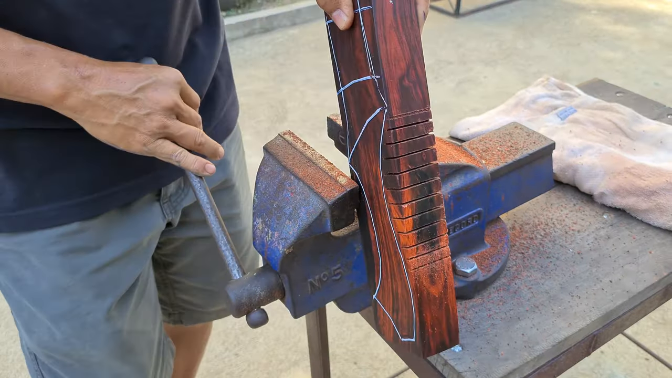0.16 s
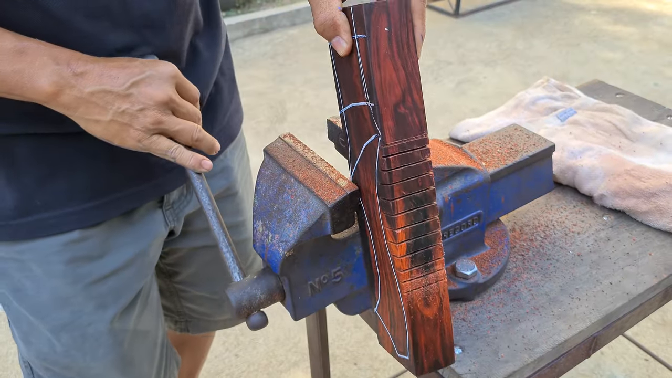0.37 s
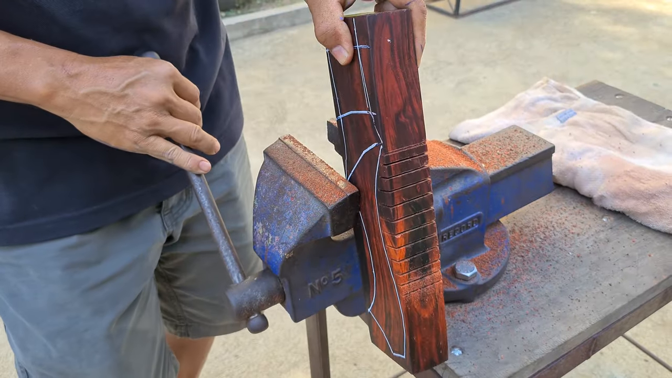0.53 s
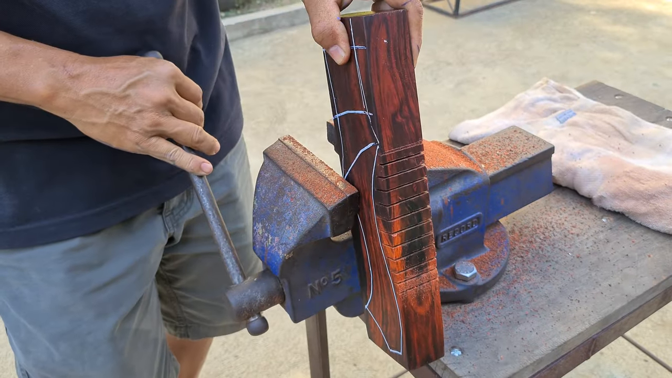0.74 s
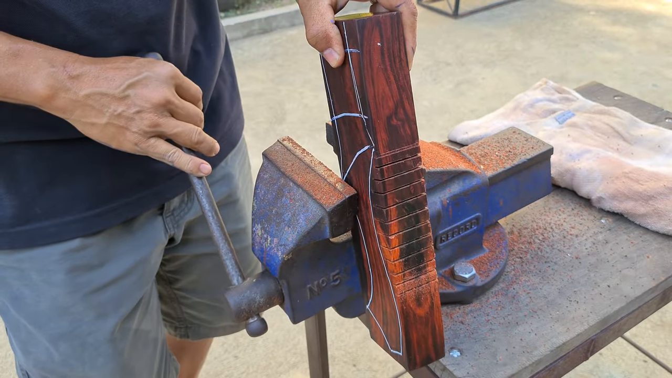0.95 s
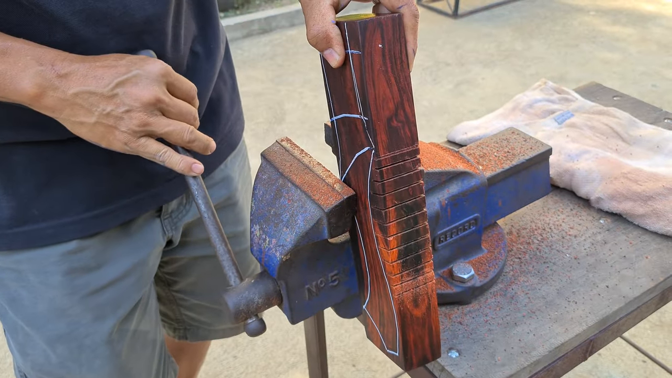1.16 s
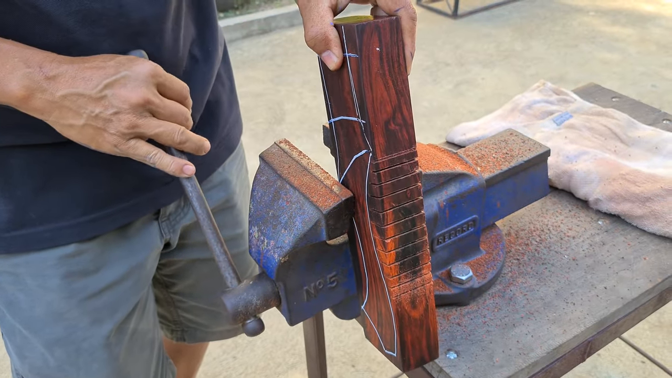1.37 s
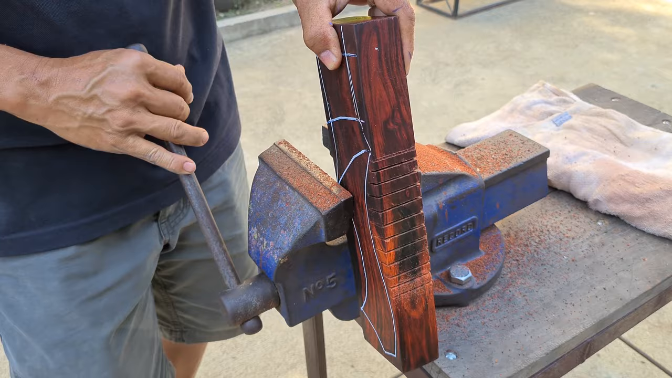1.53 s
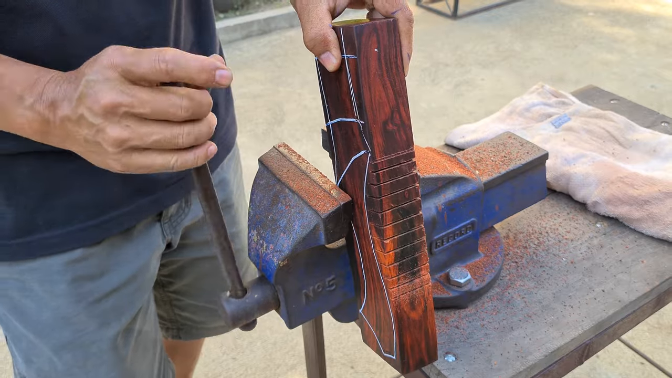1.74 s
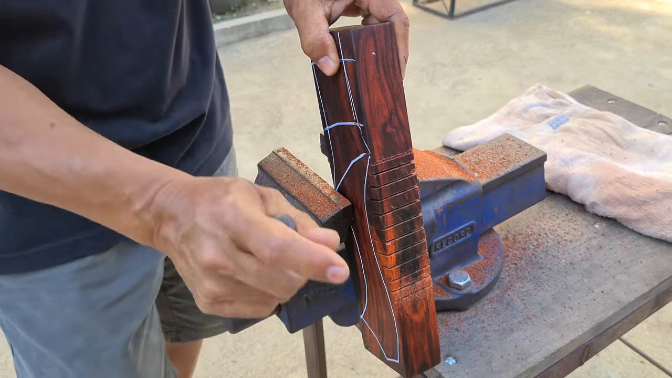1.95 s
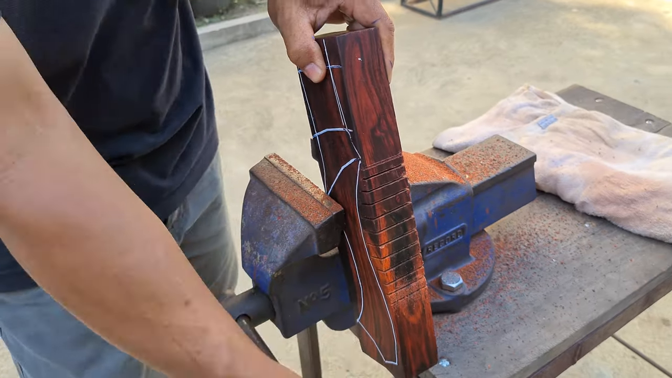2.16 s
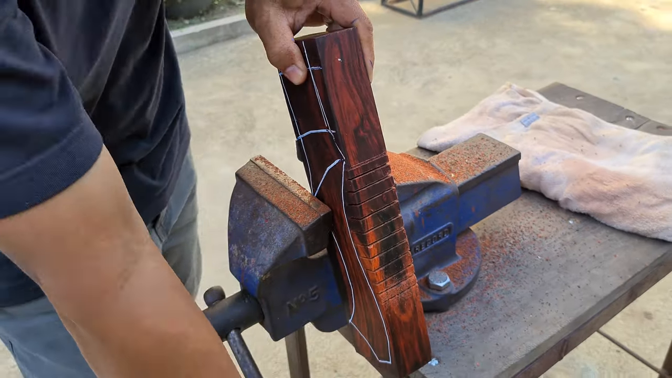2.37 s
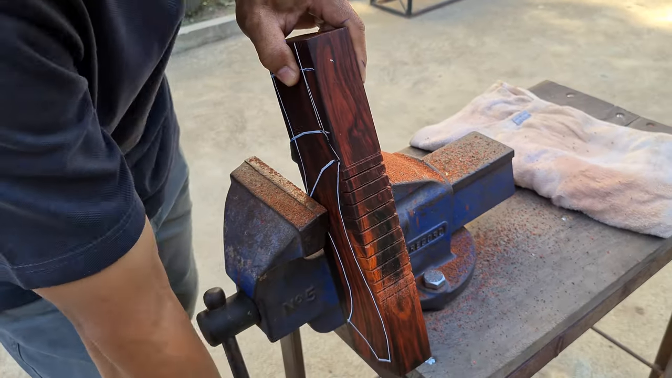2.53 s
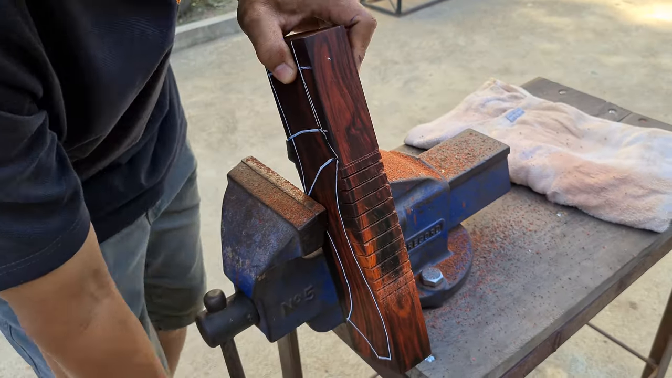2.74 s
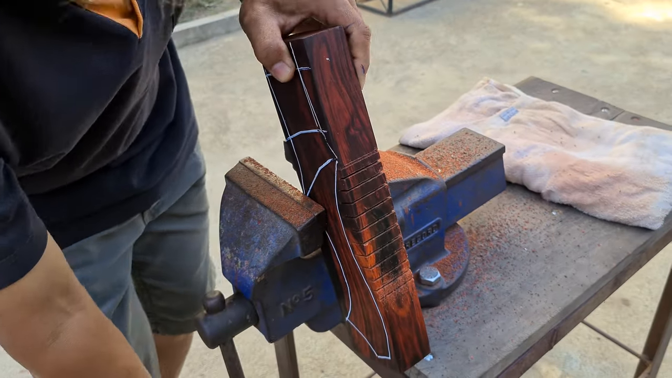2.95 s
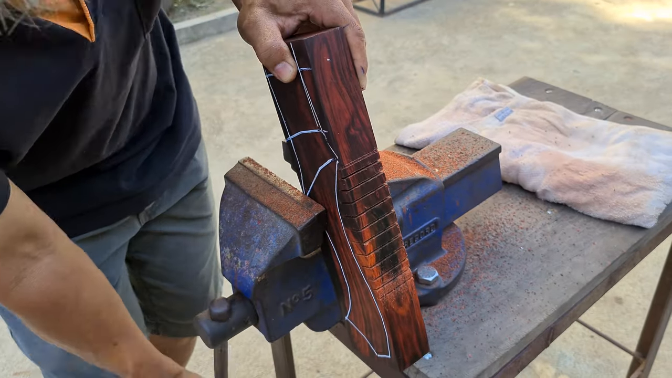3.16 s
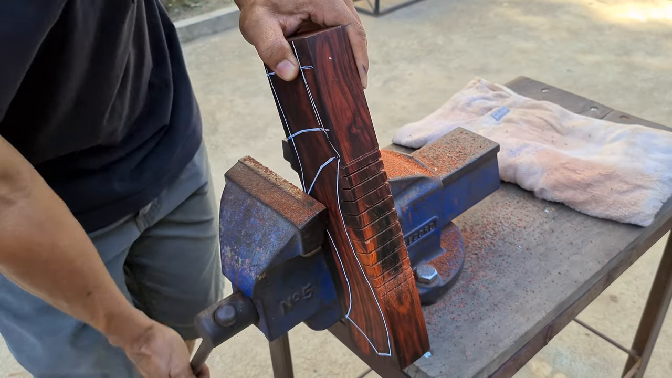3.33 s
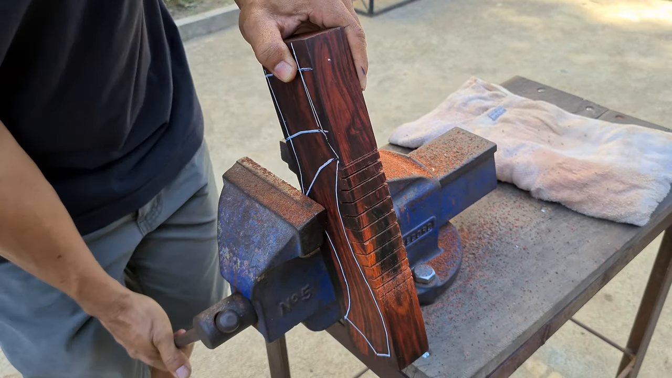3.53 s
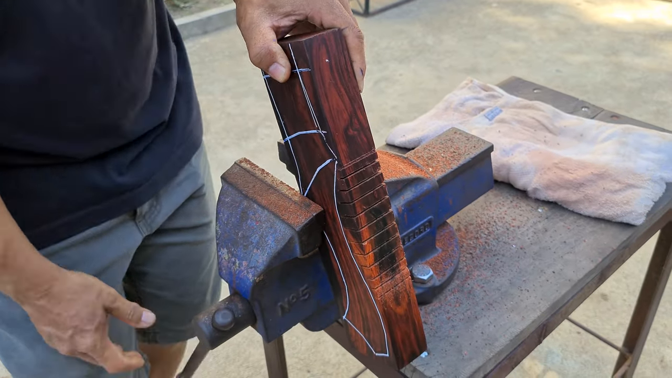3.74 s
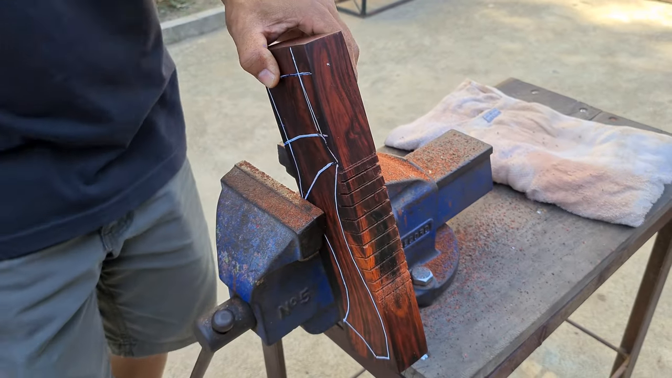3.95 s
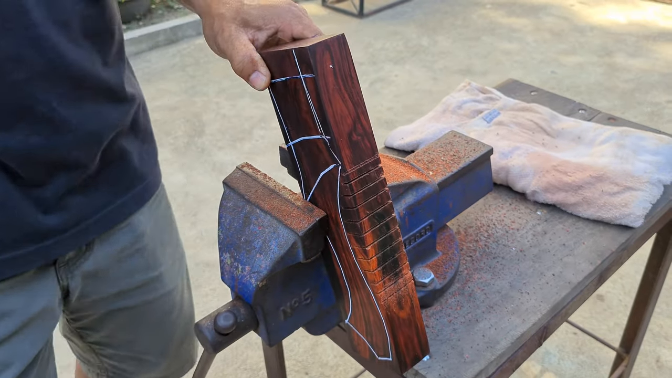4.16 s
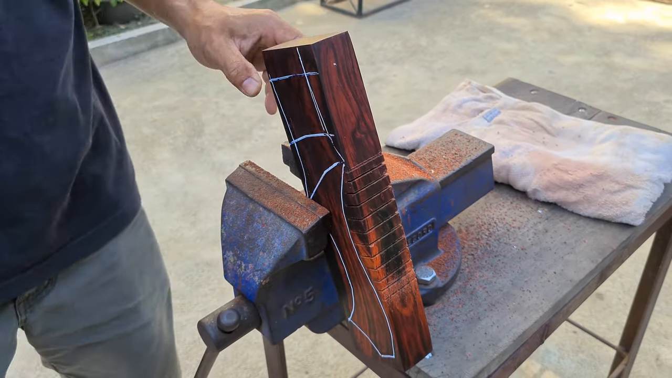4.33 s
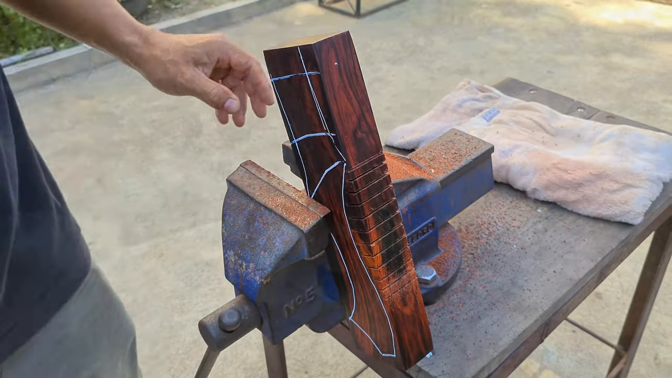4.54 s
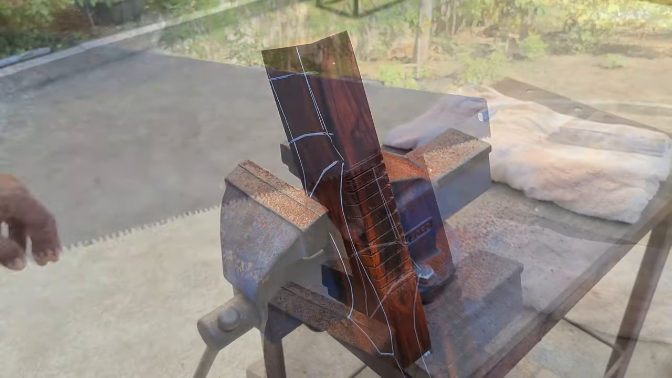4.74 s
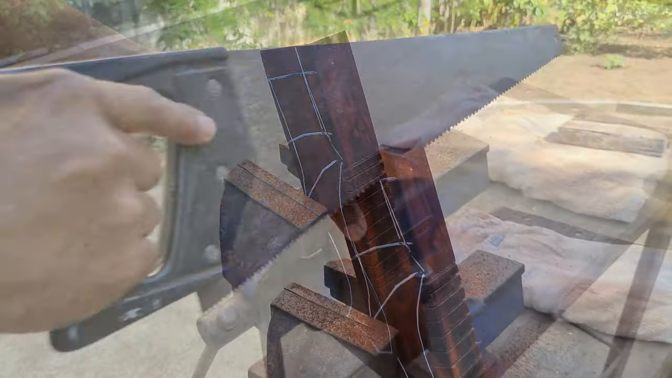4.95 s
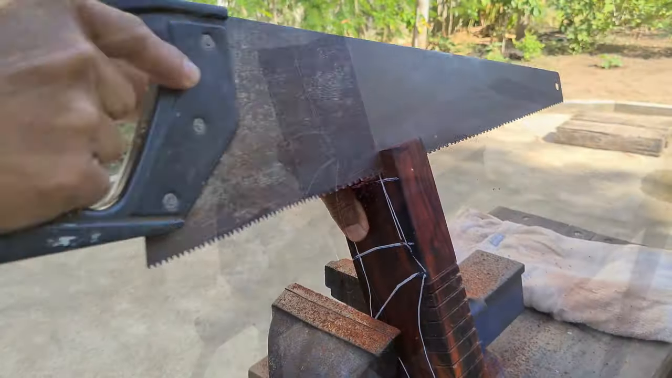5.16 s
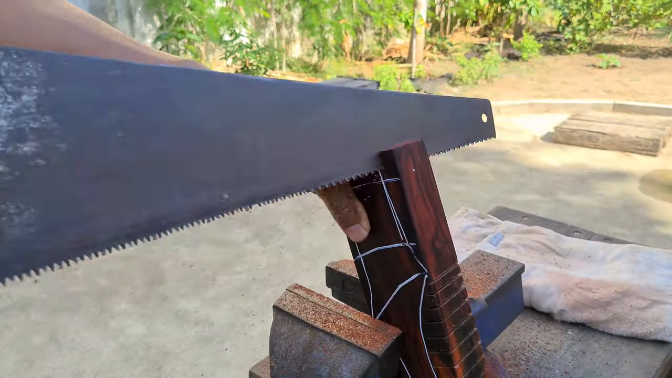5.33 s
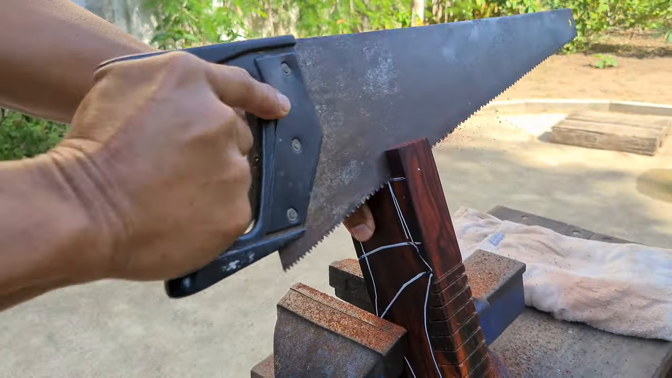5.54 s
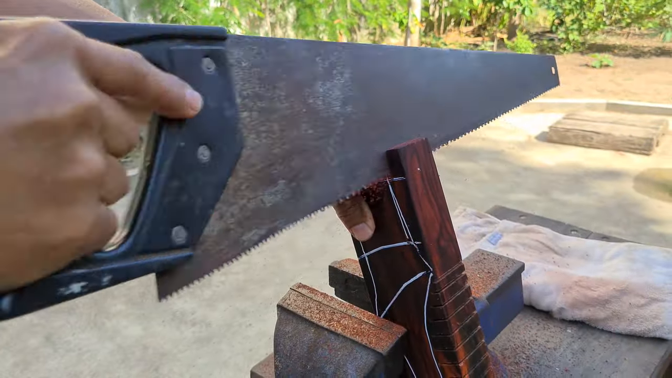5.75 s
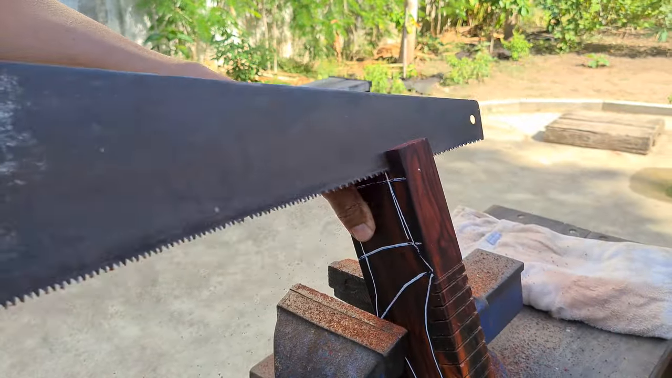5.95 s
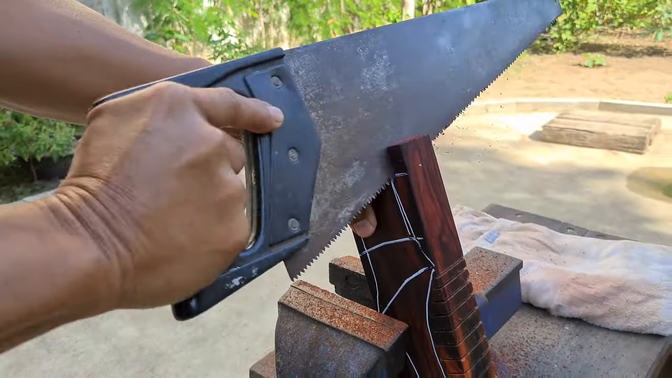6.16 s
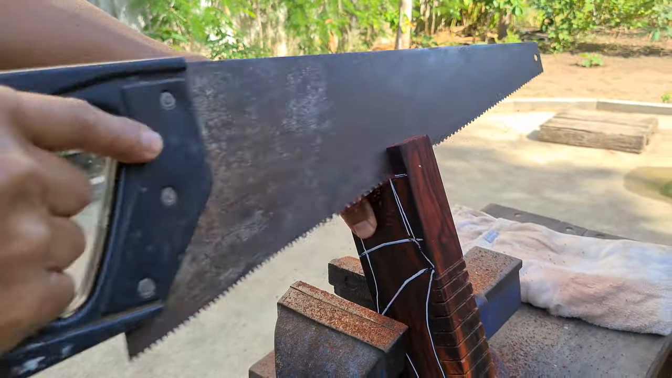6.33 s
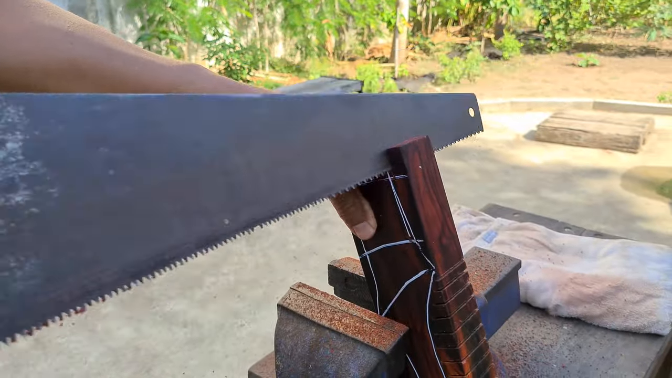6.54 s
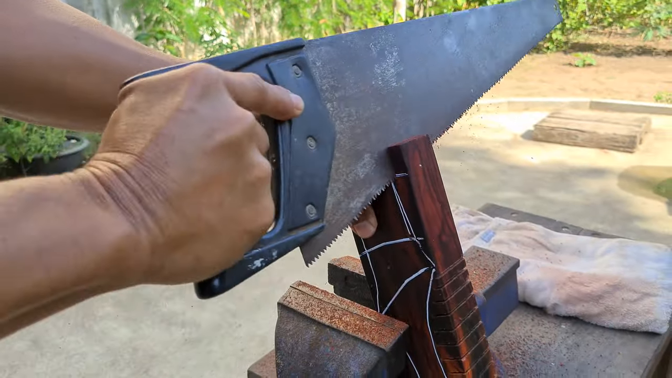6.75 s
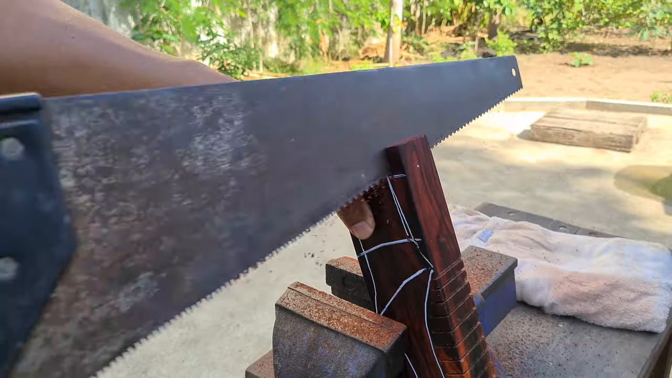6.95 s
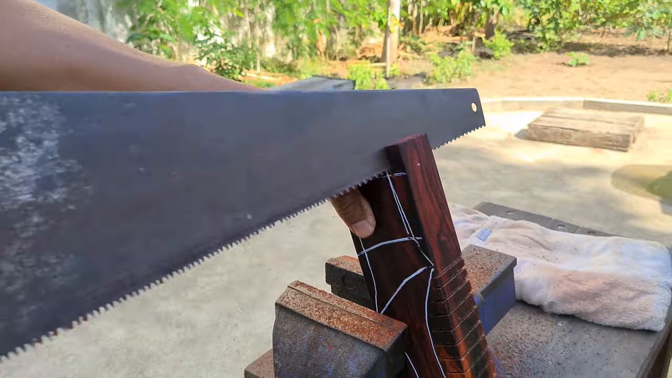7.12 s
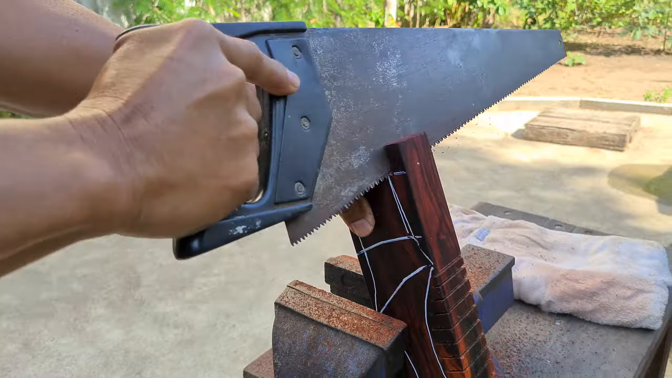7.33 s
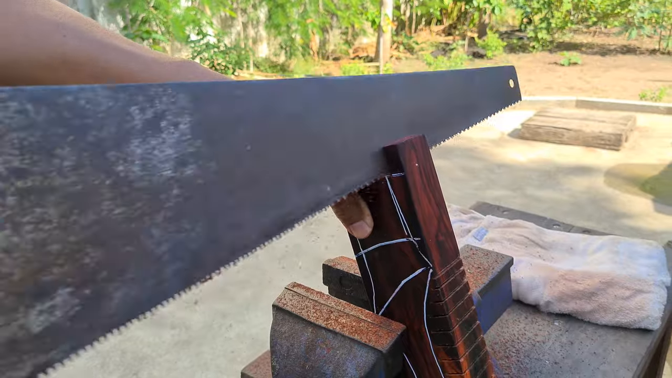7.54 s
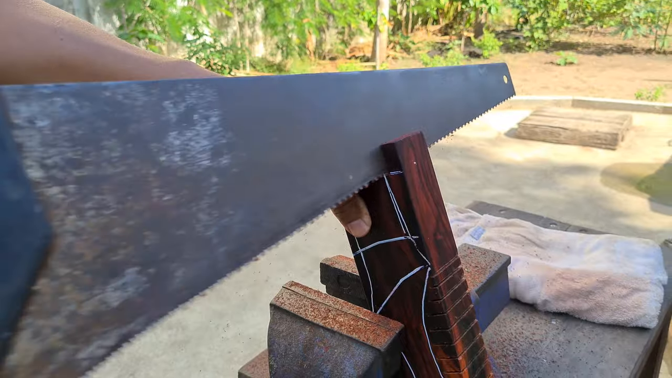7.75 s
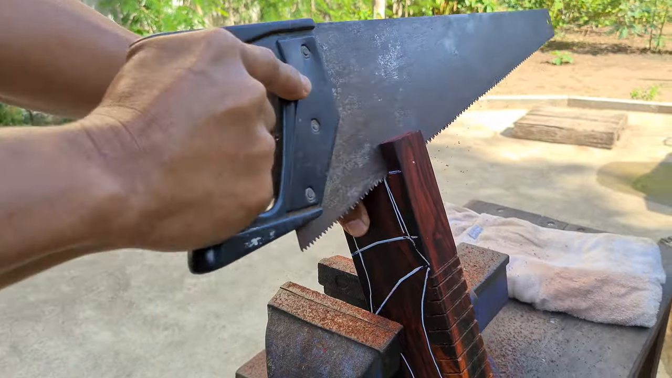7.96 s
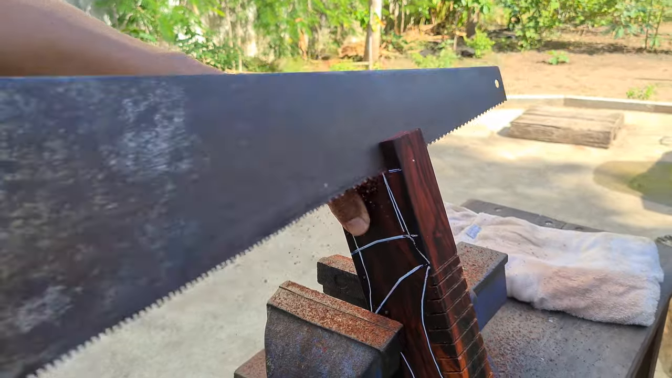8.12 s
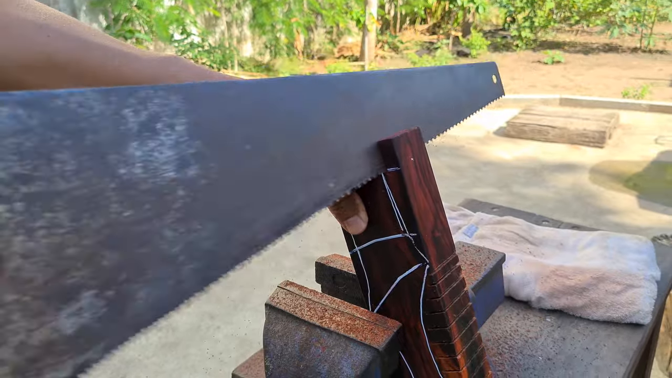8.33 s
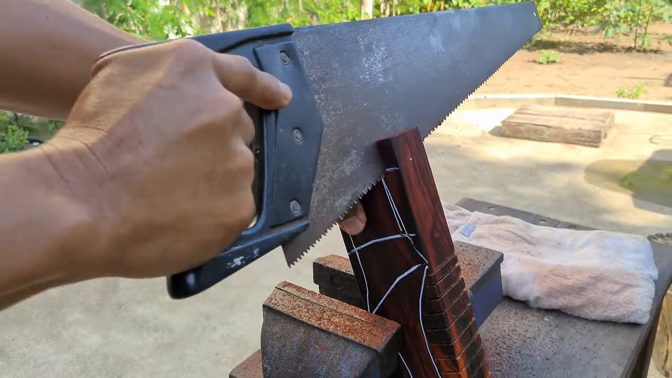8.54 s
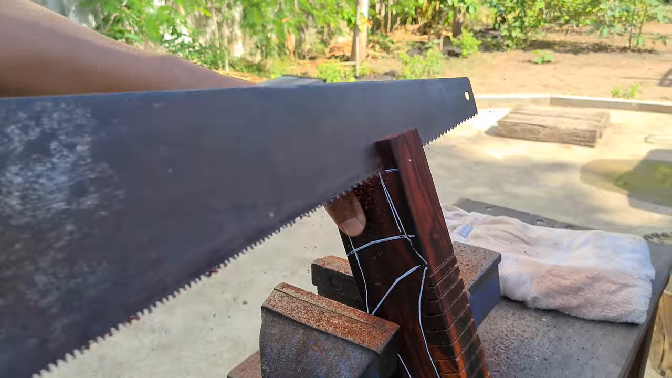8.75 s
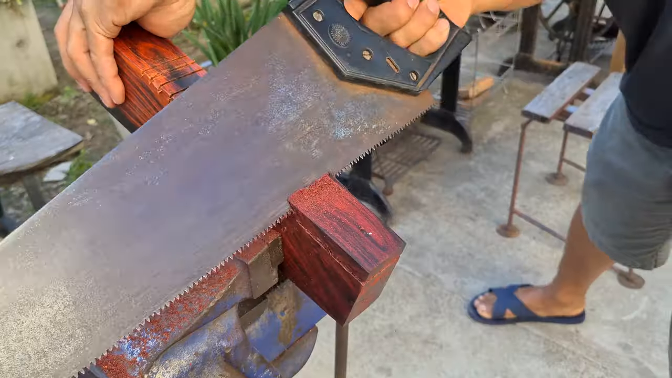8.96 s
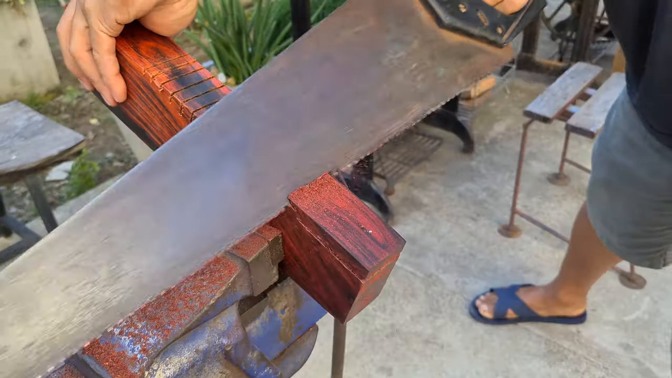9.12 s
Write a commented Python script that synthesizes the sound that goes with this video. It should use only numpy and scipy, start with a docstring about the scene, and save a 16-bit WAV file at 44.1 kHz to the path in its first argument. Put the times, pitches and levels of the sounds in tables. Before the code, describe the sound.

Outdoors, a low road rumble and a distant engine dropping in pitch underlie faint rubbing of hands on wood. A steel vise handle clanks brightly, another engine rises, and the handle clanks again more dully. After a brief rub, a hand saw swells in close to the stereo microphones, alternating lighter pulls and loud, rasping pushes through a clamped hardwood block until the end.

```python
"""First come the rumble of a far road, a distant engine falling in pitch and hands rubbing a hardwood block
in a steel vise; a second engine speeds up, and the vise handle clanks. Then a hand saw cuts in light pull and
hard push strokes. Engines are harmonic sums; road, hands and saw are filtered noise; metal rings in decaying
modes. Noise driven through the resonances of blade, block and bench makes the cut; shaped noise, the chips."""
import sys
import numpy as np
from scipy import signal
from scipy.fft import rfft, irfft, next_fast_len
from scipy.io import wavfile
from scipy.ndimage import uniform_filter1d, map_coordinates

SR = 44100
rng = np.random.default_rng(int(sys.argv[2]) if len(sys.argv) > 2 else 0)


def int16_out(signal):
    """Quantize to a 16-bit WAV file."""
    q = np.round(np.clip(np.atleast_2d(signal).T, -1, 1) * 32767)
    wavfile.write(sys.argv[1], SR, q.astype(np.int16))


N = 409688  # length [samples]


def amp(db):
    """Decibel law: the amplitude gain of a level in dB."""
    return 10 ** (np.asarray(db) / 20)


def unit(x):
    """Normalisation: scales a signal to rms 1."""
    return x / np.sqrt(np.mean(x ** 2) + 1e-20)


def along(points, hz):
    """Logarithmic frequency scale: interpolates (frequency [Hz], value) points."""
    f, v = np.transpose(points)
    return np.interp(np.log(hz + 1), np.log(f + 1), v)


def curves(rows, **ends):
    """Linear envelopes: one value per sample for each column after the time."""
    s, *cols = np.transpose(rows)
    return [np.interp(np.arange(N) / SR, s, c, **ends) for c in cols]


def wobble(rate):
    """Random modulation: a smooth curve through rate random knots a second."""
    knots = rng.standard_normal(int(N * rate / SR) + 4)
    return map_coordinates(knots, [np.arange(N) * rate / SR])


def filtered(x, response):
    """Linear filtering: the spectrum times a complex response of frequency."""
    m = next_fast_len(N + SR // 4)
    return irfft(rfft(x, m) * response(np.fft.rfftfreq(m, 1 / SR)), m)[..., :N]


def upper_part(x, corner_hz):
    """High-pass filtering: the part of x above a corner frequency."""
    return filtered(x, lambda f: 1 - 1 / (1 + (f / corner_hz) ** 6))


def ringing(modes):
    """Modal superposition: sums (centre [Hz], width [Hz], level [dB]) resonances of alternating sign."""
    def response(f):
        total = 0
        for k, (centre, width, db) in enumerate(modes):
            total = total + (-1) ** k * amp(db) * 1j * f * width / (centre ** 2 - f * f + 1j * f * width)
        return total
    return response


def spread(pair, alike, lead=0.):
    """Interaural coherence: gives two noises a left-right likeness; left leads by lead seconds."""
    def mid_side(hz):
        angle = np.arccos(np.clip(along(alike, hz), -1, 1)) / 2
        return np.array([np.cos(angle), np.sin(angle)])
    mid, side = filtered(pair, mid_side)
    left_right = np.array([mid + side, mid - side])
    return filtered(left_right, lambda hz: np.exp(1j * np.pi * lead * hz * [[1], [-1]]))


def patchy(patchy_db, spiky_db=0.):
    """Non-stationary noise: two noises share drifting patches of gain and a spiky grain."""
    white = rng.standard_normal((2, N)) * amp(spiky_db * rng.standard_normal(N))
    z = signal.stft(white, nperseg=256)[2]
    field = uniform_filter1d(rng.standard_normal(z.shape[1:]), 3, 0)  # smooth over frequency
    field = uniform_filter1d(field, 12, 1)  # smooth over time
    return signal.istft(z * amp(patchy_db * unit(field)), nperseg=256)[1][:, :N]


def plate(x, depth_db, drift_db):
    """Modal density: many narrow and a few broad bands whose strengths drift as the contact moves."""
    z = signal.stft(x, nperseg=2048, noverlap=1536)[2]

    def field(bins, steps):
        over_hz = uniform_filter1d(rng.standard_normal(z.shape), bins, 1)
        return unit(uniform_filter1d(over_hz, steps, 2))

    gain = amp(depth_db * field(2, 7) + drift_db * field(24, 4))
    return unit(signal.istft(z * gain, nperseg=2048, noverlap=1536)[1][:, :N])


# left-right coherence of the road: (frequency [Hz], likeness [0-1])
ROAD_ALIKE = [(60, 0.97), (250, 0.88), (700, 0.73), (3000, 0.069)]
ROAD_LEAD_S = 0.00039  # left before right


def rush(spectrum, patchy_db):
    """Spectral shaping: far stereo noise of rms 1."""
    shaped = filtered(patchy(patchy_db), lambda hz: amp(along(spectrum, hz)))
    return unit(spread(shaped, ROAD_ALIKE, lead=ROAD_LEAD_S))


# low traffic: (time [s], deep rumble [dB], drone [dB])
RUMBLE_LEVELS = [(0, -39.5, -46.5), (1.5, -39, -40), (2.5, -44.5, -43.5), (4.6, -42, -47.5),
                 (5.3, -56, -58), (7.3, -60.5, -56.5), (7.7, -47, -50.5), (8.3, -63, -52)]
# high traffic: (time [s], roar [dB], tyre hiss [dB])
ROAD_LEVELS = [(0, -51, -55.5), (1.6, -43, -54), (2.4, -49.5, -58), (4.4, -48.5, -60.5), (5.3, -54, -58)]
# spectral shapes of the four bands: (frequency [Hz], relative density [dB per Hz])
DEEP_SPECTRUM = [(20, -14), (45, 22), (55, 8), (70, -47)]
DRONE_SPECTRUM = [(45, -10), (70, 15.5), (140, 4.5), (230, 1.5), (330, -52.5)]
ROAR_SPECTRUM = [(240, -2.5), (600, -8), (1200, -12.5), (1800, -84)]
HISS_SPECTRUM = [(700, -30), (1300, -11), (2100, -14.5), (5400, -29.5), (6900, -30), (9000, -41.5),
                 (12000, -75)]


def traffic():
    """Incoherent summation: rumble, drone, roar and tyre hiss of a far road add as separate noises."""
    deep_db, drone_db = curves(RUMBLE_LEVELS)
    roar_db, hiss_db = curves(ROAD_LEVELS)
    deep = amp(deep_db) * rush(DEEP_SPECTRUM, patchy_db=3.0)
    drone = amp(drone_db) * rush(DRONE_SPECTRUM, patchy_db=1.0)
    roar = amp(roar_db) * rush(ROAR_SPECTRUM, patchy_db=1.5)
    hiss = amp(hiss_db) * rush(HISS_SPECTRUM, patchy_db=0.4)
    return deep + drone + roar + hiss


def phase_of(hz):
    """Phase integration: the running angle of a changing frequency."""
    return 2 * np.pi * np.cumsum(hz) / SR


def hum(phase, order, db):
    """Harmonic order: a sine on a multiple of the firing rate, a little unsteady with distance."""
    return amp(db + 1.9 * wobble(7.3)) * np.sin(order * phase + 0.3 * wobble(5))


# the engine that drops in pitch: (time [s], firing rate [Hz], second order [dB], fourth order [dB])
PASSING = [(0, 57.65, -51, -50.5), (.7, 56.64, -37, -48), (1.3, 54.94, -47, -46), (1.95, 52.2, -53, -41.5),
           (2.35, 45.4, -70, -69)]


def passing_engine():
    """Harmonic synthesis: two orders glide down with the firing rate."""
    hz, second_db, fourth_db = curves(PASSING)
    phase = phase_of(hz)
    return hum(phase, 2, second_db) + hum(phase, 4, fourth_db)


# hands on wood and cloth: (start [s], length [s], level [dB])
RUBS = [(-.05, 0.12, -51), (0.05, 0.17, -50), (1.395, .06, -54.5), (3.836, 0.21, -47), (3.996, 0.18, -49.5)]
# skin drags with a thin squeal: (start [s], length [s], level [dB], centre [Hz], width [Hz])
SQUEAL = (3.925, .09, -54, 2300, 160)
# spectrum of rubbing: (frequency [Hz], relative density [dB per Hz])
RUB_SPECTRUM = [(1000, -4), (2100, -0.5), (3000, -5), (12000, -16.5), (16000, -21)]
# grit: (time [s], level before its band filter [dB], colour [Hz])
TICKS = [(2.7568, -36, 3014), (2.842, -47, 10050), (2.9074, -45, 6506), (3.501, -36, 2200)]


def hands():
    """Friction noise: skin and cloth rub in swells of grainy noise; short band-passed bursts of grit tick."""
    grain = patchy(patchy_db=1, spiky_db=5) * amp(1.8 * wobble(300) + 3 * wobble(35))
    now = np.arange(N) / SR

    def swell(start, length, db):
        return amp(db) * np.abs(np.sin(np.pi * np.clip((now - start) / length, 0, 1)))

    rubbing = unit(filtered(grain, lambda hz: amp(along(RUB_SPECTRUM, hz))))
    out = sum(swell(*rub) for rub in RUBS) * rubbing
    *when, squeal_hz, width = SQUEAL
    squeal = unit(filtered(grain, ringing([(squeal_hz, width, 0)])))
    out = np.pad(out + swell(*when) * squeal, ((0, 0), (0, SR)))  # room for the last tick
    t = np.arange(SR // 50) / SR
    for s, db, hz in TICKS:
        band = signal.butter(2, [hz / 1.5, hz * 1.5], "band", fs=SR)
        burst = amp(db - 60 * t / 0.007) * rng.standard_normal((2, len(t)))
        out[:, round(s * SR):][:, :len(t)] += signal.lfilter(*band, burst)
    return out[:, :N]


# the engine that speeds up: (time [s], firing rate [Hz], first order [dB], second order [dB])
RISING = [(.6, 35.9, -49, -45), (1, 41.8, -37.5, -55), (1.42, 49.53, -43, -39.5),
          (2.27, 55.77, -37.5, -38.5), (3, 59.1, -36, -39), (3.97, 61.04, -32, -29.5),
          (4.41, 62.1, -40, -27), (4.66, 62.9, -28.5, -38.5), (5.15, 65.7, -38.5, -46.5),
          (5.35, 62.4, -58, -71)]
# third, fourth and fifth order: (level over the second order [dB])
RISING_UPPER_DB = [-22.5, -21, -25]


def rising_engine():
    """Harmonic synthesis: five orders follow the firing rate as the engine speeds up."""
    hz, first_db, second_db = curves(RISING)
    phase = phase_of(hz)
    out = hum(phase, 1, first_db) + hum(phase, 2, second_db)
    for k, over_db in enumerate(RISING_UPPER_DB):
        out += hum(phase, k + 3, second_db + over_db)
    return out * (np.arange(N) > RISING[0][0] * SR)


def metal_ring(modes, t, depth, rattle):
    """Damped modes with beats: rattling blurs and damps each tone, the higher ones most."""
    out = 0
    for hz, db, t60 in modes:
        decay = amp(db - 60 * t / t60 * (1 + rattle * hz / 6000))
        beat = 1 - depth * np.cos(2 * np.pi * (rng.uniform(25, 90) * t + rng.random()))
        strength = amp(rng.normal(0, 2, (2, 1)))  # each ear differs
        blur = np.cumsum(rng.normal(0, rattle * hz / 30000, len(t)))
        tone = np.sin(2 * np.pi * (hz * t + rng.random((2, 1)) / 4) + blur)
        out = out + decay * beat * strength * tone
    return out


# the handle strikes the screw:
# (time [s], overall level [dB], bar ring [dB], vise hum [dB], rattle of the bar [0-1])
CLANKS = [(1.529, -25, -19, -2, 0.52), (1.736, -41, -38, 4.5, 0.8), (3.677, -21.5, -33.5, -4.5, 0),
          (3.783, -32, -43, -0.5, .4), (3.794, -48, -40, 15, 0)]
# modes of the cast vise: (frequency [Hz], level [dB], t60 before rattle damping [s])
VISE = [(610, -7, 0.09), (1105, -3, 0.11), (1310, -5, 0.06), (1600, -1, 0.055), (1850, -5, 0.05),
        (2740, -3, 0.045), (4180, -7, .025)]
# bending modes of the steel bar: (frequency [Hz], level [dB], t60 before rattle damping [s])
BAR = [(3725, 8, .22), (6052, 5, 0.2), (7790, 1, .08), (8930, -4, 0.14), (12200, -9, 0.06)]


def handle():
    """Impact excitation: every clank knocks, hums through the vise and rings the bar, at new strengths."""
    out, t = np.zeros((2, N + SR)), np.arange(SR // 3) / SR
    dull = signal.butter(5, [600, 3600], "band", fs=SR, output="sos")
    for s, db, bar_db, hum_db, rattle in CLANKS:
        knock = signal.sosfilt(dull, rng.standard_normal((2, len(t))))
        knock *= 3.5 * amp(-60 * t / 0.025) + 0.44 * amp(-60 * t / 0.2)
        crack = 1.6 * amp(-60 * t / .035) * rng.standard_normal((2, len(t)))
        # each bending mode of the loose bar is a close pair, so it beats
        bar = metal_ring(BAR, t, depth=.5, rattle=rattle) + crack
        # a rattling bar damps the hum
        vise = amp(hum_db - 900 * rattle * t) * metal_ring(VISE, t, depth=.35, rattle=.5)
        clank = knock + vise + amp(bar_db) * bar
        out[:, round(s * SR):][:, :len(t)] += amp(db) * clank * (1 - np.exp(-t / .002))
    return out[:, :N]


# each stroke, pull first; the last row ends the sawing, and its levels shape the end of the last pull.
# Blade levels are before SWELL:
# (turn [s], blade at the turn [dB], turn to hardest [s], blade at hardest [dB], turn to let-off [s],
# base levels over the blade: block ring [dB], chip sizzle [dB], bench shake [dB])
STROKES = [(4.524, -55, 0.2, -26.5, 0.24, -5.5, -5.5, -14), (4.802, -40, 0.13, -20, .19, -4, -3.5, -19),
           (5.082, -54, 0.18, -25.5, 0.24, -3.5, -5, -15), (5.377, -40, 0.11, -18, 0.19, -1.5, -2.5, -16.5),
           (5.65, -53, 0.26, -24, 0.25, -4, -5.5, -13), (5.96, -40, 0.12, -16.5, 0.17, -0.5, -6, -18),
           (6.23, -52.5, 0.15, -28, 0.26, -7.5, -5, -17.5), (6.531, -50, 0.12, -18, 0.18, -2, -3.5, -20),
           (6.807, -56, 0.14, -26.5, 0.26, -7.5, -6, -16.5), (7.1, -47.5, 0.12, -18.5, 0.19, -3.5, -3, -18),
           (7.369, -55.5, 0.2, -25, 0.24, -4, -5.5, -13), (7.669, -45.5, 0.13, -18, 0.19, -3.5, -1, -19),
           (7.93, -52.5, 0.17, -25, 0.27, -2, -6, -12.5),
           (8.255, -50.5, 0.14, -16.5, 0.18, -2.5, -4.5, -18),
           (8.526, -55.5, 0.14, -26.5, 0.31, -5.5, -4.5, -14.5),
           (8.807, -35.5, 0.12, -19, 0.21, -3.5, -4, -19.5),
           (9.051, -34, 0.16, -29.5, 0.22, -2.5, -5.5, -15.5), (9.36, -45, .14, -20, .19, -19, 8, -13)]
# the sawing swells in: (time [s], added level [dB])
SWELL = [(4.52, -16), (4.66, -6.5), (4.92, 0.5)]
# under the hardest when the hand lets off: (pull [dB], push [dB])
LET_OFF_DB = (2.5, 5)
# after a push the blade all but stops: (time before the next turn [s], level over that turn [dB])
PUSH_REST = (0.023, 3.4)
# the teeth bite soon after the turn: (time after the turn [s], level under the hardest [dB])
PULL_BITE, PUSH_BITE = (0.05, 7), (0.041, 9.54)


def effort():
    """Force envelope: blade level through bite, hardest cut and let-off of every stroke."""
    points = []
    for k, (stroke, following) in enumerate(zip(STROKES, STROKES[1:])):
        start, turn_db, top_s, top_db, off_s = stroke[:5]
        end, end_db = following[:2]
        push = k % 2
        bite_s, under_db = (PULL_BITE, PUSH_BITE)[push]
        off_db = top_db - LET_OFF_DB[push]
        points += [(start, turn_db), (start + bite_s, max(top_db - under_db, turn_db))]
        points += [(start + top_s, top_db), (min(start + off_s, end - .01), off_db)]
        if push:
            points += [(end - PUSH_REST[0], min(end_db + PUSH_REST[1], off_db))]
    return curves(points + [(end, end_db)], left=-120)[0] + curves(SWELL)[0]


def held(modes, end):
    """Boundary condition: the resonances with the heel (end 0) or the toe (end 1) in the kerf."""
    return ringing([(hz, width, db[end]) for hz, width, *db in modes])


def along_stroke(x, modes, toe):
    """Moving boundary: crossfades the resonances from heel to toe."""
    heel_sound = unit(filtered(x, held(modes, 0)))
    toe_sound = unit(filtered(x, held(modes, 1)))
    return (1 - toe) * heel_sound + toe * toe_sound


# blade resonances: (frequency [Hz], width [Hz], level with heel in kerf [dB], level with toe in kerf [dB])
BLADE = [(1833, 154, 1, -2.5), (2390, 390, -6, -0.5), (2704, 313, -0.5, 5.5), (3120, 840, 1, -2.5),
         (4310, 710, -1, -4.5), (4900, 565, 0.5, -3), (5660, 2200, -18.5, -48)]


def blade_ring(fibres, judder, toe, bite):
    """Forced vibration of a plate: its free length changes along the stroke; force wakes the high modes."""
    shaken = fibres * amp(1.28 * judder + 0.55 * wobble(250))
    blade = plate(along_stroke(shaken, BLADE, toe), depth_db=2.0, drift_db=2.5)
    tooth_by_tooth = amp(0.31 * bite + 1.36 * wobble(700))
    return blade + (tooth_by_tooth - 1) * upper_part(blade, 3600)


# block resonances: (frequency [Hz], width [Hz], level with heel in kerf [dB], level with toe in kerf [dB])
BLOCK = [(744, 235, -7.5, -4.5), (880, 47, 0, 5), (1020, 123, -10, -5.5), (1507, 427, -12, -9.5)]


def block_ring(fibres, judder, toe):
    """Structure-borne sound: the cut drives the resonances of the clamped block."""
    return plate(along_stroke(fibres * amp(1.7 * judder), BLOCK, toe), depth_db=2.5, drift_db=1.3)


# bench resonances: (frequency [Hz], width [Hz], level [dB])
BENCH = [(219.4, 50, -5.5), (423.6, 52, 2)]


def bench_shake(fibres, judder):
    """Structural transmission: the bench answers in two low resonances, with its treble damped."""
    return unit(filtered(fibres * amp(1.64 * judder), lambda f: ringing(BENCH)(f) / (1 + (f / 900) ** 2)))


# spectrum of the chips: (frequency [Hz], relative density [dB per Hz])
CHIPS = [(4500, -13), (6000, 4), (8800, -3), (12000, 3.5), (14600, 2), (16000, -12.5)]


def chip_sizzle(fibres, judder, toe, dull):
    """Fracture noise: bright noise flickers most near the toe, where it also loses its finest sizzle."""
    flicker = fibres * amp(0.72 * judder + 2.5 * toe ** 4 * wobble(90))
    chips = plate(filtered(flicker, lambda f: amp(along(CHIPS, f))), depth_db=3.5, drift_db=1.5)
    return chips + (amp(-6.5 * dull) - 1) * upper_part(chips, 9500)


# teeth that catch: (time [s], jolt level before the resonances [dB])
SNAGS = [(4.7693, -13), (5.194, -18), (5.3535, -11.5), (5.679, -31), (5.941, -14.5), (5.97, -13),
         (6.277, -26), (6.563, -14.5), (7.1214, -26.5), (7.405, -22), (7.648, -22), (7.676, -14.5),
         (7.967, -19), (8.272, -14.5), (8.7804, -4), (8.873, -3.5)]


def snags():
    """Impulse response: catching teeth, mostly near the toe, jolt blade and block with short noise bursts."""
    jolts, t = np.zeros((2, N + SR)), np.arange(SR // 20) / SR
    for s, db in SNAGS:
        burst = amp(db - 60 * t / 0.036) * rng.standard_normal((2, len(t)))
        jolts[:, round(s * SR):][:, :len(t)] += burst
    return filtered(jolts[:, :N], lambda f: held(BLADE, 1)(f) + 0.4 * held(BLOCK, 1)(f) + .05j * (f > 2000))


# left-right coherence of the saw: (frequency [Hz], likeness [0-1])
SAW_ALIKE = [(200, 0.91), (800, 0.93), (1400, 0.019), (12000, 0.1)]
# stereo balance of the saw: (frequency [Hz], left over right [dB])
SAW_SIDE = [(200, -1), (800, 2), (4000, 0.5), (12000, -3)]


def saw():
    """Stick-slip excitation: teeth tear fibres at random and drive blade, block and bench; chips sizzle."""
    blade_db = effort()
    turns, _, hardest, _, _, ring_db, sizzle_db, shake_db = np.transpose(STROKES)
    block_db, chips_db, bench_db = curves(np.transpose([turns + hardest, ring_db, sizzle_db, shake_db]))
    index = np.arange(len(turns))
    toe = curves(np.transpose([turns, index % 2]))[0]
    toe = .5 - .5 * np.cos(np.pi * toe)  # the arm slows at both ends; 0 heel in the kerf, 1 toe in the kerf
    late = curves(np.transpose([turns, index]))[0] % 1 - .5  # -0.5 to 0.5 through each stroke
    dull = toe ** 3  # near the toe the floppy blade thumps more than it cuts
    bite = blade_db + 21.5  # [dB] hard cutting is brighter
    judder = wobble(70) + 1.13 * wobble(30)  # the blade sticks and jumps in the kerf
    fibres = patchy(patchy_db=1.5, spiky_db=3.5)

    blade = blade_ring(fibres, judder, toe, bite)
    # the long lever of a drawn blade rocks the bench
    bench = amp(bench_db - 1.5 + 5.7 * toe ** 2) * bench_shake(fibres, judder)
    wood = amp(block_db) * block_ring(fibres, judder, toe) + bench
    # the wood rings more late in the stroke, and at the turns outlasts the sizzle
    wood = amp(3.8 * late - 0.25 * np.maximum(bite, -17)) * wood
    chips = amp(chips_db + 0.19 * bite - 1.3 * dull) * chip_sizzle(fibres, judder, toe, dull)
    cut = amp(blade_db) * (blade + wood + chips) + snags()
    near = spread(cut, SAW_ALIKE, lead=.00016)
    return filtered(near, lambda f: amp(along(SAW_SIDE, f) * [[.5], [-.5]]))


def scene():
    """Superposition: all sources add at the two microphones."""
    return traffic() + passing_engine() + hands() + rising_engine() + handle() + saw()


TOP_HZ = 16100  # upper band limit


def record(dry):
    """Band limiting: nothing above the upper limit passes."""
    return filtered(dry, lambda hz: hz < TOP_HZ)


dry = scene()
out = record(dry)
int16_out(out)
```